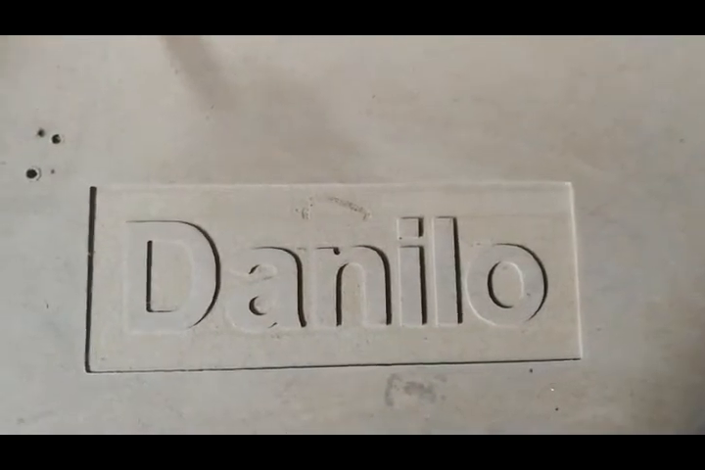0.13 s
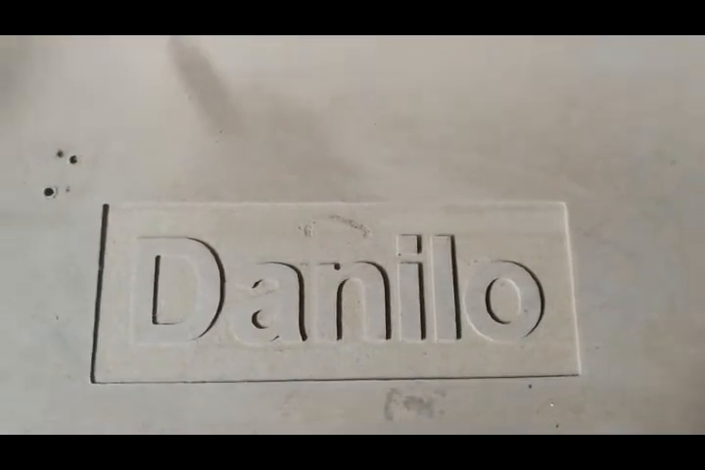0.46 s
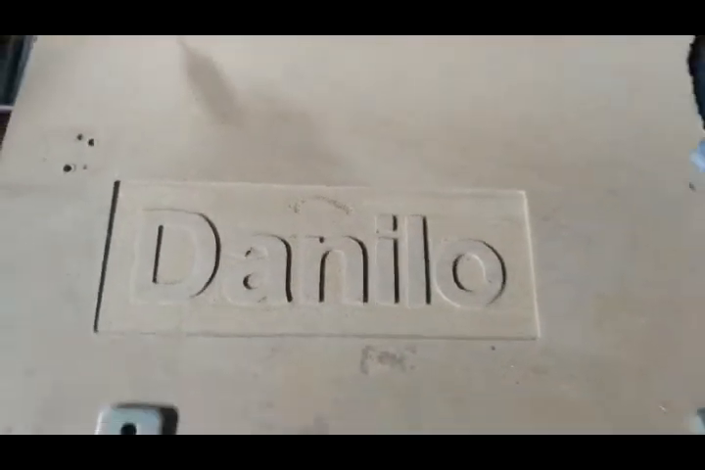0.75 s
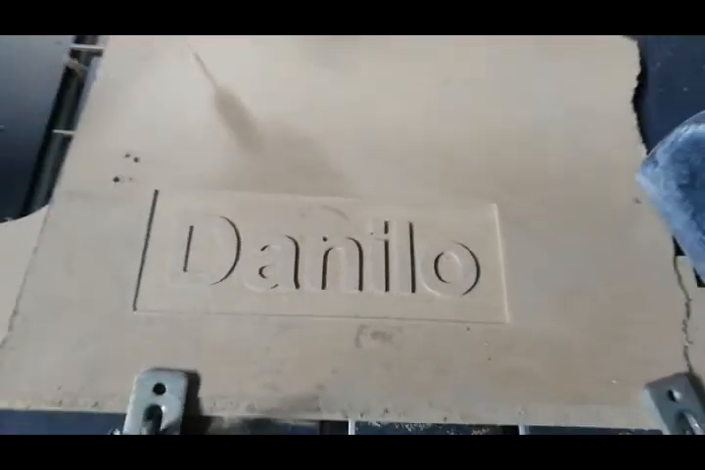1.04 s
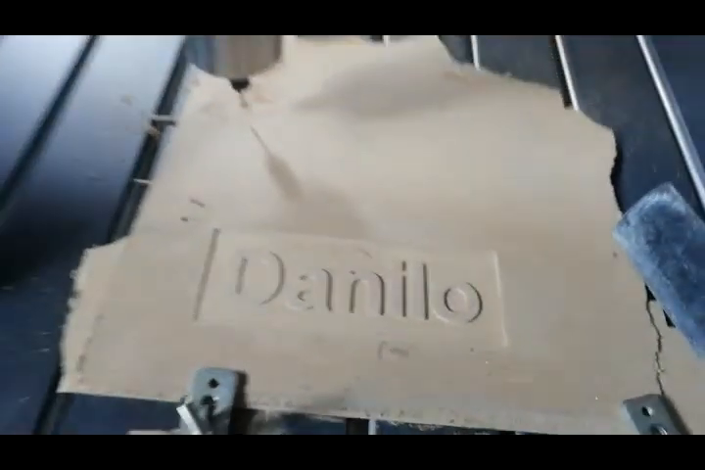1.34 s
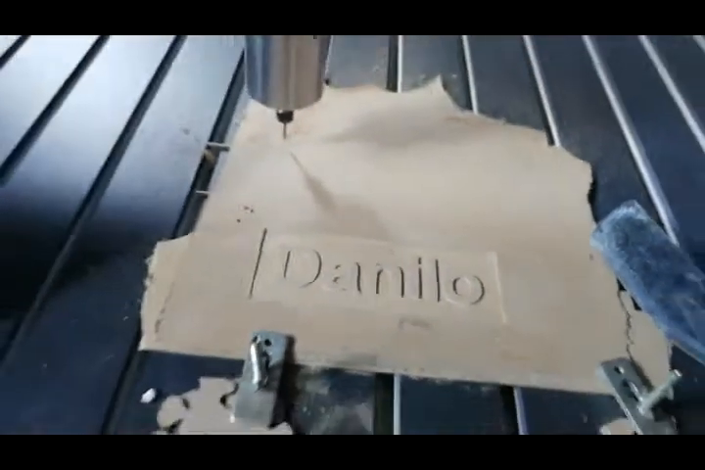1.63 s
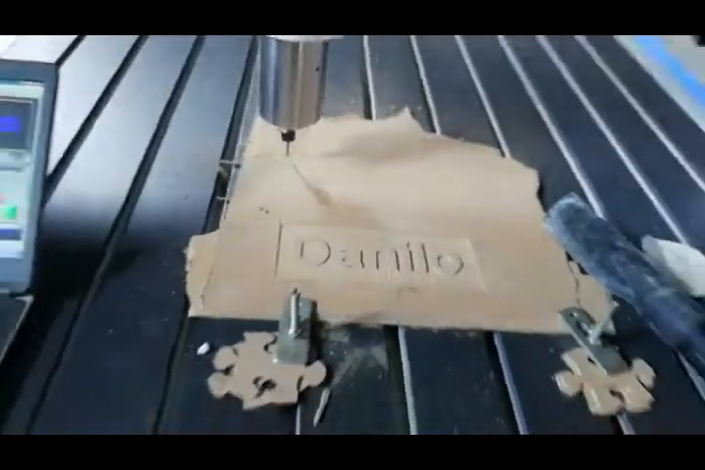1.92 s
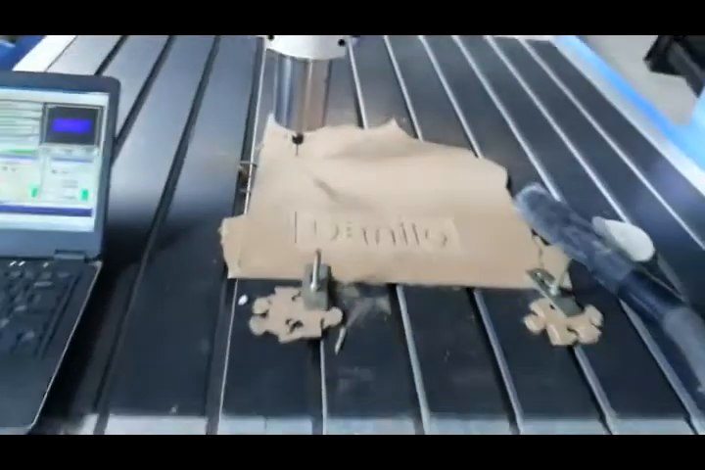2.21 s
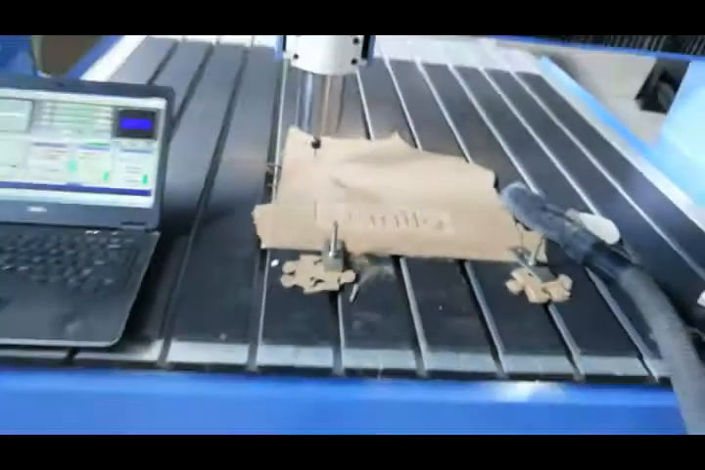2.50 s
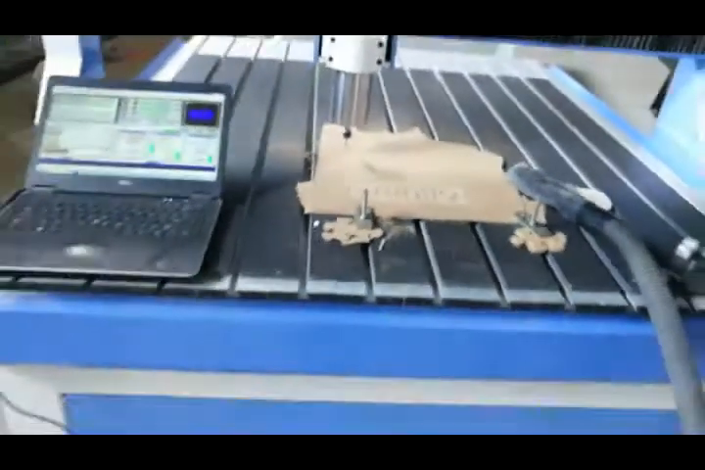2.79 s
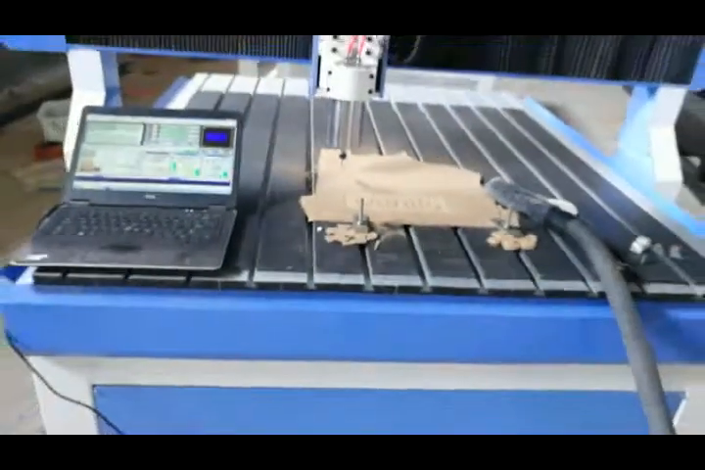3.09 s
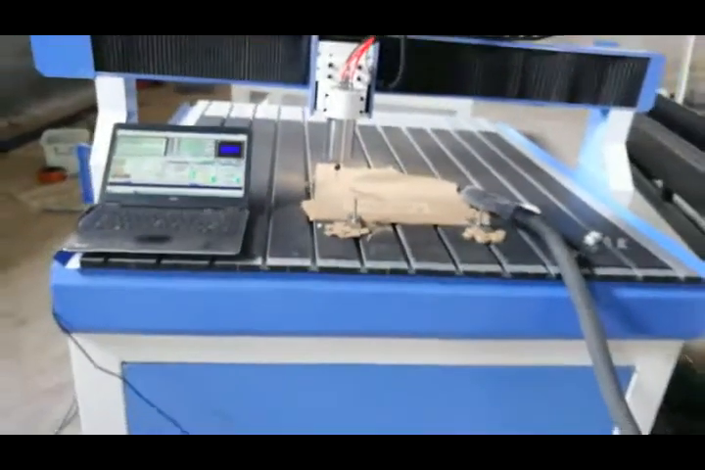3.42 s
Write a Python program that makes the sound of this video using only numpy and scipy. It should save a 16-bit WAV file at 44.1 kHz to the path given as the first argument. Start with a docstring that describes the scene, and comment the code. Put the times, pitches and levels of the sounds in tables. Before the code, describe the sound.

A router spindle runs at steady speed, a high piercing whine over airy hiss and low hum.

```python
"""A steady whine and a broad airy hiss over a low hum: a router spindle idles at full speed in a workshop.
The shaft hums once per turn and the cooling fan whines at twelve times that rate, with an octave above.
Both are tones locked to one slightly wavering shaft angle; the cooling air is shaped stereo noise.
The microphone backs away from the table: tones swell and fade as it crosses their standing waves,
and the hiss moves from right to left."""
import sys
import numpy as np
from scipy import signal
from scipy.fft import rfft, irfft
from scipy.io import wavfile
from scipy.ndimage import uniform_filter1d

SR = 44100
rng = np.random.default_rng(int(sys.argv[2]) if len(sys.argv) > 2 else 0)


def master_out(mix):
    """Clip the mix to full scale and print it as 16-bit PCM to the path in sys.argv[1]."""
    frames = np.transpose(np.atleast_2d(mix))
    ceiling = np.clip(frames, -1, 1)
    pcm = np.round(ceiling * 32767).astype(np.int16)
    wavfile.write(sys.argv[1], SR, pcm)


N = 156555

# Backing away from the spindle. Each row: time in seconds, distance from 0 near to 1 far.
DISTANCE = [(0, 0), (1.15, 0.094), (1.4, 0.19), (1.64, 0.23), (1.76, 0.57), (2.3, 0.62), (2.44, 0.77),
            (2.56, 0.84), (3.1, 0.95), (3.55, 0.81)]

# Hum of the shaft at the microphone. Each row: time in seconds, left and right level in dB.
HUM_LEVELS = [(0.0, -39.5, -36.5), (0.52, -37.5, -34.5), (0.96, -38.5, -37.0), (1.12, -38.5, -36.5),
              (1.36, -43.5, -39.5), (1.82, -35.5, -33.5), (1.98, -35.0, -32.0), (2.37, -36.0, -31.5),
              (2.57, -40.0, -35.5), (2.79, -38.5, -37.0), (2.93, -40.0, -39.0), (3.07, -38.5, -37.0),
              (3.2, -40, -39), (3.28, -45.5, -47), (3.39, -52.5, -47.0), (3.55, -53.5, -44.0)]
# Whine of the fan blades at the microphone. Each row: time in seconds, left and right level in dB.
WHINE_LEVELS = [(0.0, -50.5, -43), (0.08, -43, -47.5), (0.18, -56.5, -44.5), (0.2, -54, -39),
                (0.32, -37.5, -31.5), (0.46, -39, -27.5), (0.58, -41, -25.5), (0.66, -37, -37.5),
                (0.74, -34, -31.5), (0.82, -48, -28.5), (0.96, -40.5, -31), (0.985, -44, -47),
                (1.08, -52, -42), (1.16, -46, -54), (1.185, -39.5, -34), (1.27, -38.5, -33),
                (1.3, -35.5, -30), (1.34, -37, -32), (1.37, -35.5, -44), (1.41, -35.5, -38),
                (1.49, -48, -40), (1.54, -54.5, -56), (1.6, -46, -52), (1.62, -41.5, -35),
                (1.675, -36.5, -30.5), (1.72, -38, -36), (1.755, -43, -45), (1.785, -39, -33),
                (1.825, -38.5, -34), (1.86, -46, -39), (1.885, -38, -30), (1.915, -39, -29.5),
                (1.965, -53, -37), (2.02, -42, -31.5), (2.055, -42.5, -47), (2.08, -38.5, -36),
                (2.16, -35, -37.5), (2.23, -40.5, -33.5), (2.29, -38.5, -33), (2.35, -34.5, -43.5),
                (2.39, -37.5, -42.5), (2.41, -46.5, -34.5), (2.45, -31.5, -28), (2.49, -42, -31),
                (2.51, -43, -50), (2.55, -33.5, -34.5), (2.59, -32.5, -27.5), (2.63, -38, -30),
                (2.655, -54, -31), (2.675, -41.5, -43), (2.71, -32.5, -33), (2.78, -32, -30.5),
                (2.83, -37, -40), (2.89, -32, -33.5), (2.97, -34, -41), (3.0, -38, -45),
                (3.05, -38.5, -34.5), (3.09, -41.5, -45.5), (3.19, -45, -34.5), (3.23, -35.5, -39.5),
                (3.29, -45, -44), (3.31, -39.5, -40), (3.38, -42, -32), (3.42, -43, -30.5),
                (3.47, -36, -34), (3.5, -36, -40), (3.55, -41, -36.5)]
# Octave of the whine at the microphone. Each row: time in seconds, left and right level in dB.
OCTAVE_LEVELS = [(0.0, -47, -30.5), (0.12, -43.5, -30), (0.19, -51, -41), (0.22, -55, -29.5),
                 (0.36, -54, -30), (0.41, -43, -43), (0.48, -53, -30), (0.53, -48, -36), (0.58, -47.5, -30),
                 (0.68, -42, -30), (0.95, -45, -28), (1.1, -47, -31), (1.16, -54, -40), (1.19, -43, -25),
                 (1.32, -47, -21), (1.44, -51.5, -28), (1.48, -45, -36), (1.52, -36, -37), (1.62, -56, -43),
                 (1.66, -44, -28), (1.7, -45, -40), (1.76, -44.5, -50), (1.84, -38, -34.5),
                 (1.93, -41, -40), (2.0, -39, -41), (2.06, -43, -48), (2.155, -41, -46),
                 (2.185, -28.5, -41), (2.25, -36, -46), (2.34, -43, -51), (2.37, -34, -40),
                 (2.41, -46, -55), (2.45, -34, -54), (2.5, -40, -54), (2.64, -39, -54), (2.665, -30, -51),
                 (2.7, -36, -52), (2.73, -30, -53), (2.81, -42, -50), (2.86, -32, -52), (2.95, -32, -53),
                 (3.04, -52, -57), (3.11, -39, -55), (3.23, -40, -50), (3.27, -49, -54),
                 (3.38, -38.5, -48.5), (3.41, -48, -55), (3.47, -35, -48.5), (3.55, -36.5, -50.5)]
# Lead of the left ear in the hum. Each row: time in seconds, lead in radians.
HUM_LEFT_LEAD = [(0, -1.65), (1.4, -1.85), (1.9, -1.8), (2.45, -1.1), (3.2, -1.7), (3.4, -2.6), (3.5, -1.3)]
# Lead of the left ear in the whine, swinging as an ear passes a node.
# Each row: time in seconds, lead in radians.
WHINE_LEFT_LEAD = [(0, -2.5), (.25, .2), (.5, .3), (.6, 1.5), (.66, 4.1), (.85, 4.4), (.88, 1), (1.34, 1.8),
                   (1.45, 2.2), (1.58, 3.5), (1.69, 1.8), (1.76, 3.5), (1.82, 2), (1.86, 3), (1.92, 2.2),
                   (2.02, 3.6), (2.11, .9), (2.3, 1.8), (2.38, 3.5), (2.44, 1.3), (2.6, 1.8), (2.81, 1.6),
                   (2.85, 4), (2.9, 5.9), (3.04, 2.4), (3.12, 3.3), (3.28, 1.4), (3.32, 4), (3.4, 2.3)]
# Lead of the left ear in the octave, which keeps turning as the microphone moves.
# Each row: time in seconds, lead in radians.
OCTAVE_LEFT_LEAD = [(0, 0), (3.55, 30)]
# Weaker shaft orders. Each row: multiple of the shaft rate, near left, near right, far left
# and far right level in dB.
WEAK_ORDERS = [(6, -51.5, -56.5, -47.5, -50), (8, -64, -62.5, -57, -50.5), (13, -66, -55, -66, -70),
               (17, -65, -66, -65, -64), (19, -66, -47, -68, -67), (20, -61, -47, -60, -59),
               (21, -62, -61, -60, -59), (22, -64, -37.5, -58, -56), (36, -72, -67, -64, -62)]
# Faint wavering tones of the machine, unrelated to the shaft orders.
# Each row: frequency in Hz, level when near in dB.
FAINT_TONES = [(115, -61.5), (176, -57.5), (3607, -53), (8506, -51)]

# Rush of air and room noise, before the trim AIR_TRIM_DB. Each row: frequency in Hz, near left,
# near right, far left and far right level in dB per Hz.
AIR_COLOUR = [(30, -90.2, -90.5, -90.0, -89.8), (82, -88.5, -88.5, -88.0, -88.0),
              (102, -75.5, -75.5, -79.0, -79.0), (145, -78.5, -78.0, -84.1, -84.4),
              (175, -74.5, -74.5, -81.0, -81.0), (215, -74.7, -75.0, -80.0, -80.0),
              (290, -74.0, -74.2, -72.5, -72.5), (345, -73.5, -72.5, -67.5, -66.5),
              (420, -76.0, -73.5, -73.8, -71.8), (540, -81.9, -78.3, -79.0, -79.0),
              (800, -79.6, -74.6, -75.6, -69.5), (1000, -74.8, -71.8, -73.6, -72.8),
              (1250, -72.9, -74.3, -68.5, -71.2), (1650, -68.8, -75.3, -66.3, -72.3),
              (2100, -67.7, -68.9, -65.9, -68.8), (2550, -70.0, -68.4, -67.3, -70.5),
              (3050, -68.7, -66.0, -70.1, -65.7), (3500, -70.4, -66.0, -71.4, -70.3),
              (4000, -73.0, -67.6, -71.5, -74.1), (4800, -75.5, -67.4, -71.6, -69.8),
              (5500, -79.2, -68.4, -73.2, -70.5), (6300, -78.9, -65.5, -74.4, -71.0),
              (6900, -76.6, -62.2, -71.8, -71.3), (7700, -75.0, -59.0, -69.8, -72.9),
              (8500, -72.7, -57.3, -68.7, -78.0), (9200, -68.0, -56.3, -64.1, -79.3),
              (9900, -73.1, -62.6, -66.9, -83.1), (10700, -79.2, -69.8, -72.8, -87.2),
              (12200, -82.3, -80.3, -79.9, -85.4), (13200, -94.1, -88.8, -85.2, -88.0),
              (14500, -100.5, -111.5, -93.9, -96.2)]
# Boost of the hiss band as the microphone crosses the air jet's beam.
# Each row: time in seconds, left and right boost in dB.
HISS_BOOST = [(0, 1, 0.5), (.6, -1, 1), (1.12, 0, 1.5), (1.32, -3, 2), (1.55, -1, 1.5), (1.8, 3, 0.5),
              (1.98, 1.5, 1.5), (2.17, 3, 0.5), (2.45, 0.5, -1), (2.68, 1.5, -4), (3.05, -0.5, -1),
              (3.55, 3.5, -0.5)]
# Boost of the middle of the rush. Each row: time in seconds, left and right boost in dB.
RUSH_BOOST = [(0, 1, .5), (.55, -1, 0), (1.1, 1.5, -0.5), (1.3, -1.5, -4), (2.0, -2, -3), (2.7, 0, -2),
              (2.95, 0.5, -0.5), (3.25, 1, 0.5), (3.55, 1, -3.5)]
# Boost of the lower edge of the hiss. Each row: time in seconds, left and right boost in dB.
EDGE_BOOST = [(0, 0, 1.5), (.65, 0, 0), (1.35, 0, 0), (1.75, -.5, -3), (2.03, -.5, -5), (2.4, .5, 0),
              (3.55, -1, 0)]
# Narrow bands of the rush that briefly swell or dip.
# Each row: time in seconds, frequency in Hz, left and right boost in dB.
BRIEF_SWELLS = [(0.21, 150, 5.5, 6.5), (0.33, 2230, -9, -5), (2.97, 3070, 1, 7.5), (3.22, 2350, 2, 8.5),
                (3.18, 860, -5, 3.5), (3.47, 3300, 0, 6)]
# Likeness of the air noise at the two microphone ports. Each row: frequency in Hz, likeness from 0 to 1.
PORT_LIKENESS = [(30, 1), (110, 1), (400, 1), (650, 0.3), (1150, 0.69), (1650, 0.53), (2000, 0.51),
                 (3000, 0.29), (5000, 0.081), (14000, 0.11)]
# Lead of the left port in the shared air noise. Each row: frequency in Hz, lead in radians.
PORT_LEAD = [(30, 0), (120, -.05), (200, -.3), (290, -1), (378, -1.45), (600, -1.7), (900, -.9),
             (1550, -.9), (1850, -2.6), (2400, -2.9), (3200, -3.6), (4500, -5), (9000, -11)]

SHAFT_HZ, BLADES = 377.85, 12
SPEED_WOBBLE, WOBBLE_HZ = .00025, 7.6  # rms fraction of the speed, and its rate
HUM_SCATTER, WHINE_SCATTER, OCTAVE_SCATTER = .05, .13, .34  # scattered part relative to the steady part
SCATTER_HZ, ORDER_FADING_HZ = 22.7, 7.6
PATH_SWAY_M, SWAY_HZ, SOUND_M_PER_S = .009, 2.5, 343

HISS_HZ, HISS_WIDTH_HZ = 8800, 2400
RUSH_HZ, RUSH_WIDTH_HZ = 2500, 1400
EDGE_HZ, EDGE_WIDTH_HZ = 6200, 1100
SWELL_S, SWELL_WIDTH_HZ = 0.14, 133
RUMBLE_TOP_HZ, RUMBLE_SURGE_DB, RUMBLE_SURGE_HZ = 110, 3.5, 7
AIR_TRIM_DB, PATCHY_DB, RIPPLE_DB = -0.71, 1.31, 2
CHOP = 0.027  # peak depth of the shaft's chop in the air, as a fraction
CUTOFF_HZ = 14900


def amp(db):
    """Decibels to gain."""
    return 10 ** (np.asarray(db) / 20)


def unit(x):
    """Scales to rms 1."""
    return x / np.sqrt(np.mean(abs(x) ** 2) + 1e-20)


def curve(table, t):
    """Every column of a table, read at the times t."""
    at, *columns = np.transpose(table)
    return np.array([np.interp(t, at, column) for column in columns])


def spectrum(table, hz):
    """Every column of a table, read on a log-frequency axis."""
    at, *columns = np.transpose(table)
    return np.array([np.interp(np.log(hz + 1), np.log(at + 1), column) for column in columns])


def drift(rate_hz):
    """Slow random motion of rms 1, up to about the given rate."""
    hz = np.fft.rfftfreq(N, 1 / SR)
    lowpass = 1 / (1 + (hz / rate_hz) ** 2)
    return unit(irfft(rfft(rng.standard_normal(N)) * lowpass, N))


def fading(rate_hz):
    """Randomly wandering strength and phase for each ear."""
    return np.array([unit(drift(rate_hz) + 1j * drift(rate_hz)) for ear in range(2)])


def blotches(shape, frames_count, bins_count):
    """A smooth random field of rms 1 over time and frequency."""
    field = rng.standard_normal(shape)
    field = uniform_filter1d(field, frames_count, axis=1, mode="wrap")
    return unit(uniform_filter1d(field, bins_count, axis=2, mode="wrap"))


def band_boost(table, t, hz, centre_hz, width_hz):
    """A moving boost in dB for each ear, shaped as a bell over frequency."""
    bell = np.exp(-((hz - centre_hz) / width_hz) ** 2)
    return curve(table, t)[..., None] * bell


def port_noise(frames_count, hz):
    """Noise spectra at two spaced ports: part shared with a phase lead, part independent."""
    a, b, c, d = rng.standard_normal((4, frames_count, len(hz)))
    likeness = np.clip(spectrum(PORT_LIKENESS, hz), 0, 1)
    right = a + 1j * b
    shared = likeness * right * np.exp(1j * spectrum(PORT_LEAD, hz))
    left = shared + np.sqrt(1 - likeness ** 2) * (c + 1j * d)
    return np.array([left, right])


def air_levels(t, hz):
    """Colour of the air in dB per Hz: it follows distance and shifting reflections, in uneven patches."""
    near, far = np.split(spectrum(AIR_COLOUR, hz)[:, None], 2)
    db = AIR_TRIM_DB + near + (far - near) * curve(DISTANCE, t)[..., None]
    db = db + band_boost(HISS_BOOST, t, hz, HISS_HZ, HISS_WIDTH_HZ)
    db = db + band_boost(RUSH_BOOST, t, hz, RUSH_HZ, RUSH_WIDTH_HZ)
    db = db + band_boost(EDGE_BOOST, t, hz, EDGE_HZ, EDGE_WIDTH_HZ)
    # the low rumble comes in lumps
    surge = np.interp(t, np.arange(N) / SR, drift(RUMBLE_SURGE_HZ))
    db = db + RUMBLE_SURGE_DB * surge[:, None] * np.exp(-(hz / RUMBLE_TOP_HZ) ** 4)
    for s, centre_hz, *swell_db in BRIEF_SWELLS:
        from_peak = ((t[:, None] - s) / SWELL_S) ** 2
        from_centre = ((hz - centre_hz) / SWELL_WIDTH_HZ) ** 2
        db = db + np.multiply.outer(swell_db, np.exp(-from_peak - from_centre))
    db = db + PATCHY_DB * blotches(db.shape, frames_count=8, bins_count=18)
    return db + RIPPLE_DB * blotches(db.shape, frames_count=50, bins_count=3)


def air(angle, size=2048):
    """Turbulent cooling air: coloured noise, lightly chopped once and twice per shaft turn."""
    hop = size // 4
    t = np.arange(N // hop + 5) * hop / SR
    hz = np.fft.rfftfreq(size, 1 / SR)
    frames = port_noise(len(t), hz) * amp(air_levels(t, hz))
    noise = signal.istft(frames, nperseg=size, noverlap=size - hop, time_axis=1, freq_axis=2)[1][:, :N]
    per_hz = np.sqrt(1.5 * SR / size)  # makes the levels read as dB per Hz
    chop = 1 + CHOP * (np.cos(angle) + np.cos(2 * angle)) / 2
    return per_hz * noise * chop


def side_tones(waver_hz=6, far_db=-6):
    """Faint tones, alike in both ears, that waver and recede with distance."""
    t = np.arange(N) / SR
    tones = 0
    for hz, db in FAINT_TONES:
        wave = fading(waver_hz)[0] * np.exp(2j * np.pi * hz * t)
        tones = tones + amp(db) * np.sqrt(2) * wave.real
    return tones * amp(far_db * curve(DISTANCE, t))


def weak_orders(angle):
    """Weaker multiples of the shaft rate, fading in and out and changing level with distance."""
    away = curve(DISTANCE, np.arange(N) / SR)[0]
    out = 0
    for multiple, *levels_db in WEAK_ORDERS:
        near, far = np.split(np.array(levels_db)[:, None], 2)
        wave = fading(ORDER_FADING_HZ) * np.exp(1j * round(multiple) * angle)
        out = out + np.sqrt(2) * wave.real * amp(near + (far - near) * away)
    return out


def tone(angle, multiple, levels, leads, scatter):
    """One shaft order: its path sways with the hand, and moving air scatters a part of it."""
    t = np.arange(N) / SR
    gain = amp(curve(levels, t))
    lead = curve(leads, t)[0]
    # the weaker ear shifts most in phase
    right_share = gain[1] ** 2 / (gain ** 2).sum(0)
    left_phase = np.cumsum(np.diff(lead, prepend=0) * right_share)
    ear_phases = np.array([left_phase, left_phase - lead])
    sway = 2 * np.pi * multiple * SHAFT_HZ * PATH_SWAY_M * drift(SWAY_HZ) / SOUND_M_PER_S
    steady = np.exp(1j * (sway + ear_phases))
    wave = unit(steady + scatter * fading(SCATTER_HZ)) * np.exp(1j * multiple * angle)
    return np.sqrt(2) * wave.real * gain


def spindle(angle):
    """Shaft hum once per turn, fan whine once per blade with its octave, and the weaker orders."""
    hum = tone(angle, 1, HUM_LEVELS, HUM_LEFT_LEAD, HUM_SCATTER)
    whine = tone(angle, BLADES, WHINE_LEVELS, WHINE_LEFT_LEAD, WHINE_SCATTER)
    octave = tone(angle, 2 * BLADES, OCTAVE_LEVELS, OCTAVE_LEFT_LEAD, OCTAVE_SCATTER)
    return hum + whine + octave + weak_orders(angle)


def scene():
    """One slightly wavering shaft speed drives the shaft tones and the chop in the air."""
    speed_hz = SHAFT_HZ * (1 + SPEED_WOBBLE * drift(WOBBLE_HZ))
    angle = 2 * np.pi * np.cumsum(speed_hz) / SR
    return air(angle) + side_tones() + spindle(angle)


def record(dry):
    """The recorder's band limit: a steep low-pass filter."""
    taps = signal.firwin(511, CUTOFF_HZ, window=("kaiser", 9), fs=SR)
    return signal.oaconvolve(dry, taps[None], "same")


dry = scene()
out = record(dry)
master_out(out)
```